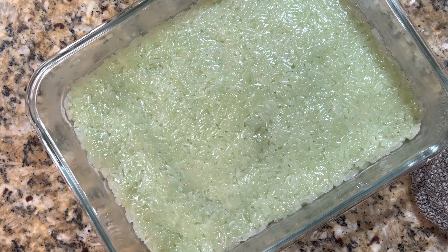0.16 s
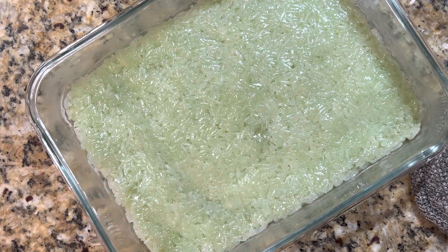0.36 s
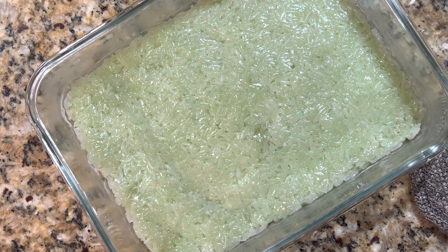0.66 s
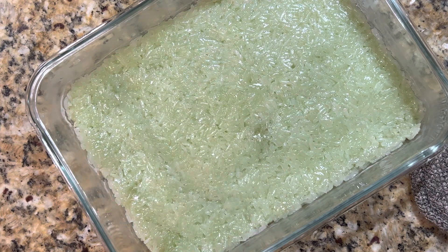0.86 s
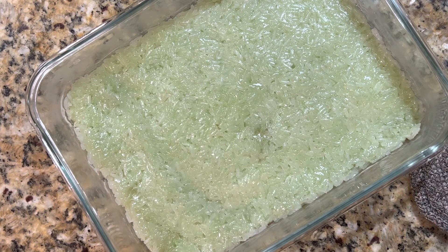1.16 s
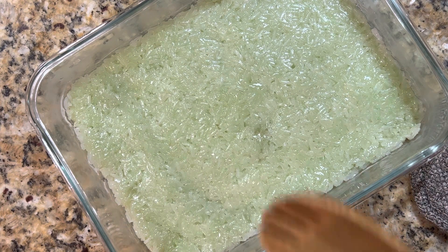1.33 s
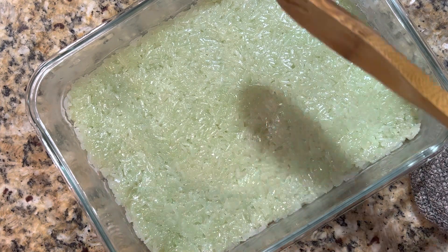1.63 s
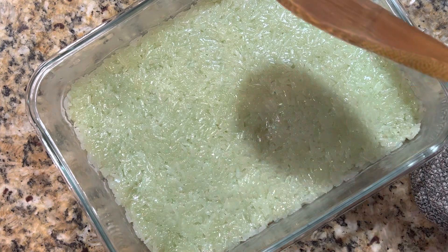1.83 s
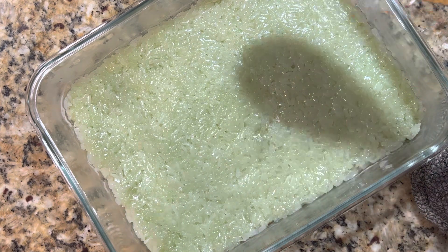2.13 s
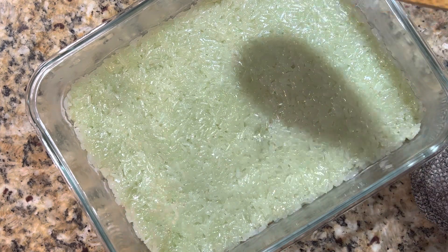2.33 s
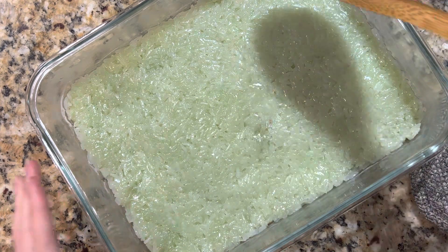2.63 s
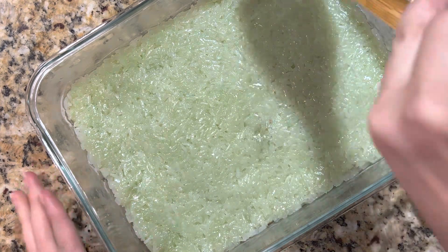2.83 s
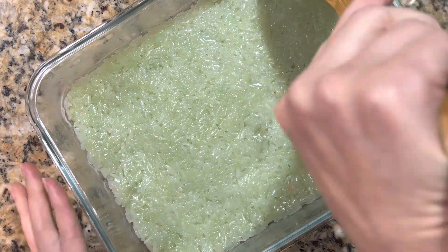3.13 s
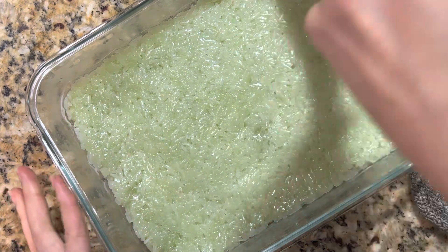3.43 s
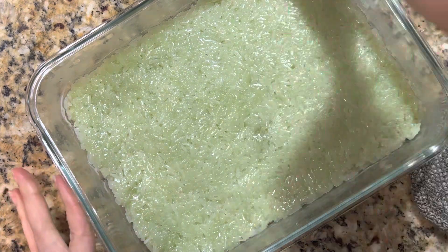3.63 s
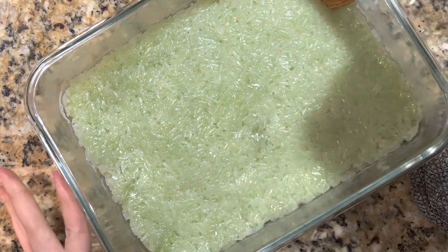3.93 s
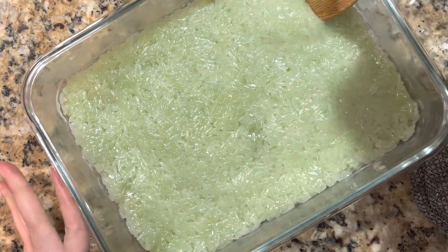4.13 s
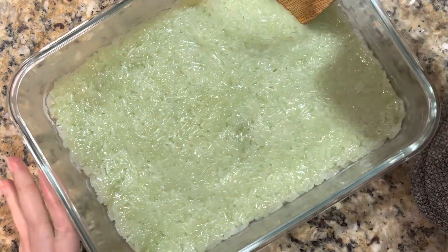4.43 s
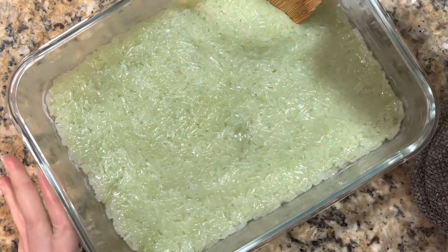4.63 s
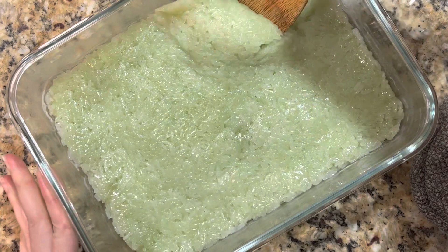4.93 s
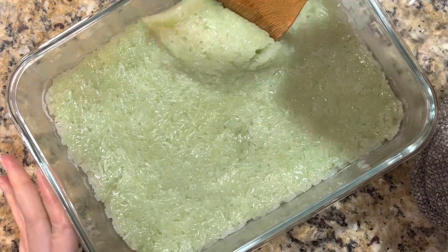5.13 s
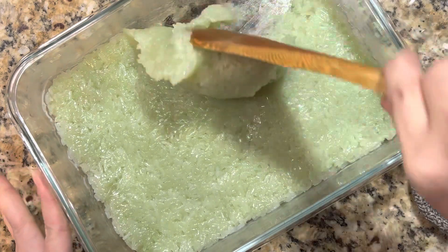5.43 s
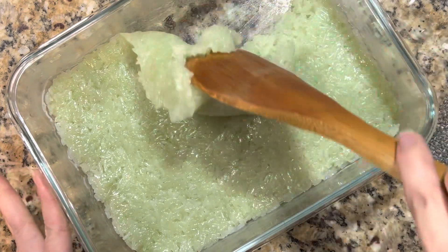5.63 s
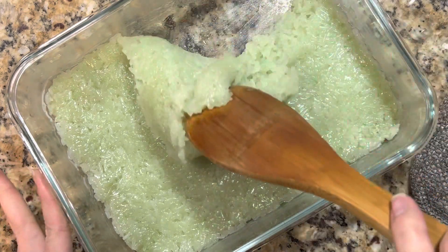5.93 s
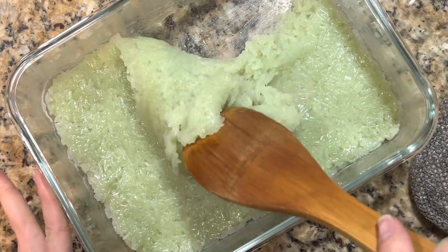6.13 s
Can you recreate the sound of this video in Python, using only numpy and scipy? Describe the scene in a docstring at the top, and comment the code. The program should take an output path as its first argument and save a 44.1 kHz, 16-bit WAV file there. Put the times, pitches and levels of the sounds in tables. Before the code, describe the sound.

In a kitchen with a steady low appliance hum, a drawer rolls out with rattling contents, pauses, rolls back and bangs shut with a boomy ring. Close to the microphone, a wooden paddle then clacks sharply on a glass dish, taps lightly, digs into soft rice with short groans and dull thuds, and lifts a sticky clump with crackle and pops.

```python
"""A kitchen drawer rolls out, rolls back, meets its catch and bangs shut: filtered impacts and ringing panels.
Its contents settle; stick-slip squeaks sound on a glass dish of soft cooked rice, then a wooden paddle knocks
on it, exciting its damped modes, and digs in; groans follow along the glass, and a sticky clump lifts with
crackle, pops and small squelches: many brief decaying notes.
An appliance hums throughout in wavering lines over air noise; the two microphone ports are close by."""
import sys
import numpy as np
from scipy import signal
from scipy.fft import rfft, irfft, next_fast_len
from scipy.io import wavfile
from scipy.ndimage import uniform_filter1d, minimum_filter1d, map_coordinates

SR = 44100
rng = np.random.default_rng(int(sys.argv[2]) if len(sys.argv) > 2 else 0)


def unload_audio(sound):
    """Save the sound as a 16-bit wav file, at the path given as the first command line argument."""
    columns = np.transpose(np.atleast_2d(sound))
    # keep every value between -1 and 1, then stretch to whole-number steps
    steps = np.round(np.clip(columns, -1, 1) * 32767)
    wavfile.write(sys.argv[1], SR, steps.astype(np.int16))


N = 277389

# All levels are relative: each function weights and sums its own parts.
# Paddle blows on the dish: start_s, level_db, contact_lowpass_hz, after_ring_db, contact_highpass_hz,
# wood_pitch_hz, wood_db
KNOCKS = [(2.9487, -7.5, 10000, 3, 200, 3230, 1), (3.5679, -20.5, 1980, -25, 606, 1310, 9.5),
          (3.571, -30.5, 1680, -22, 620, 1060, 8), (3.8065, -25.5, 5000, -26, 1890, 2520, 14),
          (3.8073, -26.5, 2720, -26, 495, 540, 14)]
# Modes of the damped glass dish: pitch_hz, level_db, t60_s, after_ring_share_db
DISH_MODES = [(527, -12.5, 0.029, -28), (924, -5.5, 0.024, -27.5), (986, -6.5, 0.025, -33),
              (1200, -10, 0.023, -42), (1460, -16, 0.025, -57), (1960, -11, 0.018, -55),
              (2700, -20, 0.02, -21), (2820, -11, 0.024, -44), (3020, -9, 0.024, -41),
              (3440, -15, 0.028, -43), (3760, -6.5, 0.0091, -54), (4840, -20, 0.02, -43),
              (5500, 1, 0.0057, -43), (5997, -14, 0.032, -44), (6840, -10, 0.0079, -41),
              (7214, -15, 0.017, -42), (8000, -11, 0.012, -34), (8620, -10, 0.016, -52)]
# Spectrum of the contact noise: pitch_hz, density_db
CLACK_SPECTRUM = [(100, -1), (600, 7.5), (1200, -6), (2000, -2.5), (3200, -4), (4500, 1.5), (5600, 0),
                  (8500, -25), (10500, -11), (16000, -7)]
WOOD_T60_S = 0.0043
CHATTER_PER_S, CHATTER_DEPTH = 140, 0.9  # the paddle chatters against the ringing glass

# Squeaks and groans on the glass, in runs of slips: start_s, first_level_db, first_pitch_hz, slip_count,
# gap_s, growth_per_slip_db, pitch_loss_per_slip (0-1), scrape_db
SLIP_RUNS = [(2.507, -39, 4540, 1, .01, 3, 0, -7.5), (2.661, -30.5, 4300, 1, .01, -2, 0, -18),
             (4.046, -31.5, 1580, 2, .013, -3, .05, -24), (4.102, -28, 3070, 2, .001, -2, 0.05, -33),
             (4.3531, -16, 1004, 4, .0082, -5, 0.07, -6), (4.403, -32, 1560, 2, .0042, -1, 0, -22),
             (4.4338, -14.5, 964, 4, .0098, -4, .06, -7.5), (4.478, -32, 1450, 2, .007, -2, 0, -19),
             (4.492, -27, 990, 2, .0065, 0.5, .1, -6), (4.5054, -15, 540, 1, .01, 0, 0, -7),
             (4.61, -27.5, 1430, 1, .01, 0, 0, -14), (4.618, -28, 1440, 4, .005, 2.5, .04, -14),
             (4.6442, -20.5, 1460, 3, .0043, -3.5, .05, -19), (4.6735, -9, 564, 2, .011, 4, 0, -12),
             (4.7055, -7.5, 626, 4, .0066, -7, 0.05, -4.5)]
# Partials of a slip: pitch_ratio, level_db, cycles_to_60_db_decay
SLIP_PARTIALS = [(.72, -6.5, 10.8), (1, 0, 16.4), (1.36, -12, 18), (2.8, -29, 25)]
SLIP_RISE_CYCLES = 0.51  # time constant of the onset
SLIP_LOW_CUT = 0.53  # share of its pitch below which a slip radiates little

# Pops, ticks and small squelches: start_s, level_db, pitch_hz
POPS = [(2.883, -35, 5660), (3.203, -33, 6100), (3.318, -31, 6700), (3.366, -48, 6400),
        (3.439, -31.5, 8400), (3.527, -36, 5800), (3.537, -37, 5960), (3.6072, -24, 7300),
        (3.6124, -29, 2740), (3.631, -31, 2720), (3.6307, -26, 6000), (3.640, -31, 6200),
        (3.647, -31, 5650), (3.659, -30, 2840), (3.68, -23, 6900), (3.7215, -35, 5950), (3.748, -24, 11000),
        (3.759, -25.5, 10500), (3.7931, -25.5, 6050), (3.945, -33, 3850), (3.9606, -25.5, 6350),
        (4.117, -28.5, 10900), (4.1357, -33, 6200), (4.524, -29.5, 2980), (4.7577, -28, 6500),
        (4.7718, -21, 6100), (4.821, -25, 5760), (4.844, -34, 1450), (4.89, -34, 3250), (4.9, -30, 1450),
        (4.947, -35, 1550), (4.963, -33, 5350), (5.005, -47, 1380), (5.0821, -29.5, 1400),
        (5.153, -31, 3570), (5.156, -24, 7850), (5.162, -16, 5600), (5.1945, -17.5, 2980),
        (5.199, -9, 9250), (5.2146, -22, 3250), (5.233, -28, 3820), (5.2636, -6, 8170), (5.307, -30, 4000),
        (5.3136, -12.5, 7900), (5.324, -31, 6000), (5.361, -17, 7900), (5.377, -20, 7340),
        (5.384, -17, 6440), (5.3935, -25, 7050), (5.4022, -19.5, 7900), (5.426, -31, 6500),
        (5.4865, -25.5, 3000), (5.502, -22, 2900), (5.577, -31, 8300), (5.5978, -27, 6840),
        (5.618, -37, 2900), (5.6384, -25, 3160), (5.7436, -28, 7660), (5.804, -48, 2880),
        (5.822, -27.5, 7600), (5.861, -48, 2830), (5.938, -40, 3260), (5.964, -38, 2880),
        (5.983, -29.5, 6000), (6.1946, -31, 3360), (6.203, -30, 7400), (6.227, -30, 7480)]
POP_CYCLES = 15  # cycles in which the note falls 60 dB
POP_SNAP_T60_S, POP_RISE_S = 0.0035, 0.0002
POP_TAIL_DB, POP_TAIL_T60_S = -18, 0.034  # the snap echoes briefly inside the dish
SMALL_POPS_PER_S, SMALL_POP_DB, SMALL_POP_SCATTER_DB = 14, 6, 9  # level over the effort, and its +/- range
SMALL_POP_HZ, SMALL_POP_OCTAVES = 5350, 0.81  # middle pitch and its +/- range
# How hard the rice is worked, before the offset below: time_s, level_db
WORK = [(3.16, -67.5), (3.44, -62.5), (3.79, -59.5), (3.95, -59.5), (4.14, -60), (4.41, -62.5), (4.67, -53),
        (4.84, -54.5), (5.14, -54.5), (5.36, -52), (5.64, -56.5), (6.29, -58)]
WORK_OFFSET_DB = 3
# Spectrum of the crackle: pitch_hz, density_db
CRACKLE_SPECTRUM = [(500, -28), (1400, -5.5), (2000, -1), (3000, 9), (4600, -3.5), (6000, 10), (7800, 7),
                    (11800, -3), (13500, -10)]
CLUMPING_DB, CLUMPS_PER_S = 3.5, 63  # the crackle comes in little clusters
# Spectrum of the squelching air pockets: pitch_hz, density_db
SQUELCH_SPECTRUM = [(200, -8), (750, 1), (1050, 4), (1450, 3), (1900, -2.5), (3000, -15), (5000, -23)]
SQUELCH_DB, LIFT_S, RELEASE_DB_PER_S = -4, 5.22, 24  # suction lets go once the clump lifts
# Volleys of snaps as a sheet of rice tears: start_s, length_s, level_db, pitch_hz
TEARS = [(3.705, 0.067, -53, 10500), (5.142, 0.029, -42, 3600), (5.187, 0.0114, -46, 4000),
         (5.212, 0.032, -42.5, 4800)]
# Brief dry rubs on the glass: start_s, length_s, level_db, pitch_hz
RUBS = [(2.603, 0.068, -62, 4420), (2.961, 0.12, -50.5, 3240), (3.072, 0.055, -47, 3136),
        (3.603, 0.056, -42, 2870), (4.482, 0.024, -49.5, 2700)]
# Shoves of the dish on the counter: start_s, level_db
SHOVES = [(3.805, -41), (4.37, -33), (4.646, -29), (4.687, -24.5), (4.707, -20), (4.726, -45)]

# The drawer meets its catch: start_s, level_db
CATCH = (1.8435, -7.5)
# Then the drawer meets the cabinet: start_s, level_db
SLAM = (1.8522, -13.5)
# Modes of the cabinet panels: pitch_hz, level_db, t60_s
CABINET_MODES = [(53.4, -5.5, 0.82), (151.6, -3.5, 0.31), (168, 2.5, 0.25), (200, 5, 0.2), (257, -7, 0.51),
                 (356.5, -15, 0.19), (463, -9, 0.49), (611, -11, 0.46), (843, 3, 0.1), (968, -14, 0.39),
                 (1100, -23, 0.68), (1235, 1, 0.18), (1620, -25, 0.6), (1600, -30, 0.3), (2030, -17, 0.61),
                 (2150, -15, 0.39), (2360, -22, 0.48)]
# Spectrum of the bang: pitch_hz, density_db
BANG_SPECTRUM = [(25, -19), (55, 6.5), (100, 3.5), (170, 6.5), (300, 4), (550, -6), (850, -8), (1250, -9),
                 (2200, -9.5), (3300, -20.5), (5000, -25.5), (6800, -28), (9500, -39.5), (13000, -66)]
# Decay of the bang's wash: pitch_hz, t60_s
BANG_DECAY = [(60, 0.64), (170, 0.49), (500, 0.49), (1500, 0.7), (3000, 0.7), (7000, 0.78), (11000, 1)]

# The drawer is pulled out, then pushed back: start_s, stop_s, rumble_db, slowing_loss_db_per_s
PASSES = [(-0.06, 0.462, -27.5, 9.5), (1.03, 1.84, -28.5, 26)]
PUSH_S, COAST_T60_S = 0.025, 0.8  # time to get going; rumble dying after the stop
# Spectrum of the roller rumble: pitch_hz, density_db
ROLLER_SPECTRUM = [(24, -36), (40, -3), (134, -4), (223, 2.5), (347, 1), (425, -18), (500, -7), (599, -8),
                   (779, -20.5), (1270, -17.5), (1430, -22.5), (2100, -23), (2320, -31), (2730, -23.5),
                   (3150, -36), (5000, -64), (6500, -78), (11000, -120)]
# Spectrum of the rattling contents: pitch_hz, density_db
RATTLE_SPECTRUM = [(410, 8.5), (700, 8), (877, 2.5), (1310, 5), (1410, -10), (1980, 2), (3570, -2),
                   (5070, -10), (5750, -3.5), (7300, -4.5), (11600, -27.5), (14000, -72)]
RATTLE_DB = -21  # steady rattle against the rolling level
# Jolts of the drawer on its runners: start_s, rattle_db, t60_s, box_knock_db
JOLTS = [(0.24, -38, 0.024, -58), (0.372, -37.5, 0.087, -54), (0.382, -32.5, 0.21, -24.5),
         (1.132, -30.5, 0.16, -54), (1.14, -30, 0.09, -26), (1.166, -41, 0.26, -26.5)]
SETTLE_DB, SETTLE_RISE_S, SETTLE_T60_S = -8, 0.0026, 0.5  # the contents rattle on after a jolt
# Swishes of the moving drawer and of its contents settling after the slam: peak_s, level_db
SWISHES = [(0.32, -47.5), (0.41, -42.5), (1.05, -51.5), (1.145, -69), (1.555, -51), (1.742, -45.5),
           (2.191, -51.5), (2.41, -60.5)]
SWISH_RISE_DB_PER_S, SWISH_FALL_DB_PER_S = 298, 84
# Spectrum of the swishes: pitch_hz, density_db
SWISH_SPECTRUM = [(400, -11), (2000, -0.5), (4500, -7), (6000, -2.5), (8200, -5.5), (11600, -22),
                  (14000, -61)]
# Drones where the rollers roll evenly: start_s, length_s, level_db, pitch_hz
DRONES = [(0.0, 0.19, -37, 350), (0.01, 0.2, -42, 490), (1.05, 0.14, -37, 358), (1.19, 0.17, -35.5, 195),
          (1.18, 0.26, -44, 490), (1.22, 0.22, -44, 610)]
DRONE_WAVER_PER_S = 130

# Lines of the motor's hum: pitch_hz, level_db, line_width_hz
HUM_LINES = [(52.6, -49, 10), (116.6, -50.5, 3.1), (213.2, -44, 13), (325, -61.5, 5.5), (421.5, -60, 9.1)]
# Spectrum of the rushing air: pitch_hz, density_db
AIR_SPECTRUM = [(20, -36), (35, -39), (55, -1), (85, -6), (150, -7.5), (215, -10), (300, -15), (450, -17),
                (700, -27), (1100, -32.5), (2200, -37.5), (4800, -48.5), (7000, -47.5), (11800, -48.5),
                (14000, -59.5)]
AIR_DB = -44.5
# Reverberation of the kitchen: pitch_hz, t60_s
KITCHEN_DECAY = [(150, 0.52), (700, 0.58), (1800, 0.48), (3500, 0.32), (9000, 0.3), (14000, 0.038)]
# Port difference, before any lean on the direct sound: pitch_hz, side_minus_mid_db
SPREAD = [(60, -34.5), (200, -19), (380, -10.5), (700, -1.5), (1290, -2.5), (2400, -38), (4400, -3.5),
          (6000, -14), (8100, -10.5), (10000, -1), (13000, 17.5)]
TOP_HZ = 16400


def amp(db):
    """Level law: decibels to amplitude gain."""
    return 10 ** (np.asarray(db) / 20)


def unit(x):
    """Normalization: scale to rms 1."""
    return x / np.sqrt(np.mean(x ** 2) + 1e-20)


def along(points, hz):
    """Logarithmic frequency scale: interpolate (pitch_hz, value) points."""
    f, v = np.transpose(points)
    return np.interp(np.log(hz + 1), np.log(f + 1), v)


def wobble(rate):
    """Slow random modulation: a smooth curve through rate random knots a second."""
    knots = rng.standard_normal(int(N * rate / SR) + 4)
    return map_coordinates(knots, [np.arange(N) * rate / SR])


def filtered(x, response):
    """Linear filtering: the spectrum of x times a complex response of frequency."""
    n = x.shape[-1]
    m = next_fast_len(n + 8192)  # padding keeps the filter's tail from wrapping round
    return irfft(rfft(x, m) * response(np.fft.rfftfreq(m, 1 / SR)), m)[..., :n]


def coloured(x, spectrum):
    """Spectral shaping: x filtered by (pitch_hz, level_db) points, at rms 1."""
    return unit(filtered(x, lambda hz: amp(along(spectrum, hz))))


def dying(x, decay):
    """Frequency-dependent damping: each band of x fades with its own t60."""
    hz, t, z = signal.stft(x, SR, nperseg=256)
    loss = amp(-60 * t / along(decay, hz)[:, None])
    return signal.istft(z * loss, SR, nperseg=256)[1][:len(x)]


def fade(t, t60):
    """Exponential decay: 60 dB in t60."""
    return np.exp(-np.log(1000) * t / t60)


def highpass(order, hz):
    """Butterworth high-pass sections."""
    return signal.butter(order, hz, "high", fs=SR, output="sos")


def add(track, s, sound):
    """Superposition: mix a sound into the track at time s."""
    part = track[round(s * SR):][:len(sound)]
    part += sound[:len(part)]


def grains(rate, spread_db):
    """Random impulse process: rate a second, sizes spread exponentially in dB, at rms 1."""
    chance = rng.random(N)
    size = np.minimum(rng.exponential(size=N), 4)
    return unit((chance < rate / SR) * amp(spread_db * size) * rng.choice([-1, 1], N))


def films(rate, cycles, spread_db):
    """Superposed transients: tiny films snap, each dying in a few cycles at its own pitch; rms 1."""
    count = round(rate * N / SR)
    when, pitch, size = rng.random((12000, 3))[:count].T[..., None]  # at most 12000 films
    hz, k = 1200 + 14000 * pitch, np.arange(160)
    strength = amp(spread_db * np.minimum(-np.log(1 - size), 4)) * np.sqrt(hz)
    waves = strength * np.sin(2 * np.pi * hz * k / SR) * fade(k / SR, cycles / hz)
    places = (when * N).astype(int) + k
    return unit(np.bincount(places.ravel(), waves.ravel(), N)[:N])


def knocks():
    """Impact and modal response: a softer contact excites the high modes less; a few modes ring on."""
    out, t = np.zeros(N), np.arange(SR // 2) / SR
    for s, db, bright_hz, ring_db, low_hz, wood_hz, wood_db in KNOCKS:
        blow = amp(-4) * coloured(rng.standard_normal(len(t)), CLACK_SPECTRUM) * fade(t, 0.012)
        blow += amp(wood_db) * np.sin(2 * np.pi * wood_hz * t) * fade(t, WOOD_T60_S)
        chatter = 0.7 + CHATTER_DEPTH * wobble(CHATTER_PER_S)[:len(t)]
        for hz, level, t60, share_db in DISH_MODES:
            after_ring = amp(ring_db + share_db) * chatter * fade(t, 0.57)
            phase = rng.uniform(0, 2 * np.pi)
            blow += amp(level) * (fade(t, t60) + after_ring) * np.sin(2 * np.pi * hz * t + phase)
        softness = signal.butter(5, bright_hz, fs=SR, output="sos")
        contact = np.vstack([softness, highpass(2, low_hz)])
        onset = 1 - np.exp(-t / 0.000092)
        add(out, s, amp(db) * signal.sosfilt(contact, blow * onset))
    return out


def slip(t, hz, scrape_db):
    """Stick-slip release: one squeak or groan with its scrape, longer the lower its pitch."""
    voice = np.zeros(len(t))
    for ratio, level, cycles in SLIP_PARTIALS:
        if hz * ratio < 6000:
            detune = 1 + rng.normal(0, 0.039)
            wave = np.sin(2 * np.pi * hz * ratio * detune * t)
            voice += amp(level) * wave * fade(t, cycles / (hz * ratio))
    spectrum = [(hz / 4, -20), (hz * 0.55, -1), (hz * 1.2, 0), (hz * 2, -15), (hz * 3, -22),
                (hz * 6, -44), (hz * 30, -70)]
    scrape = coloured(rng.standard_normal(len(t)), spectrum) * fade(t, 0.026)
    onset = 1 - np.exp(-t * hz / SLIP_RISE_CYCLES)
    return signal.sosfilt(highpass(3, SLIP_LOW_CUT * hz), (voice + amp(scrape_db) * scrape) * onset)


def slips():
    """Stick-slip friction: squeaks and groans on the glass, in runs of slips whose level and pitch may shift."""
    out, t = np.zeros(N), np.arange(SR // 10) / SR
    for s, db, hz, count, gap, growth, sag, scrape_db in SLIP_RUNS:
        for k in range(round(count)):
            add(out, s + k * gap, amp(db + k * growth) * slip(t, hz * (1 - sag) ** k, scrape_db))
    return out


def effort(s):
    """Mechanical work as level in dB at time s; practically silent until the rice is worked."""
    return WORK_OFFSET_DB + np.interp(s, *np.transpose(WORK), left=-120)


def small_pops():
    """Random transients: lesser pops, louder the harder the rice is worked: start_s, level_db, pitch_hz."""
    start, end = WORK[0][0], WORK[-1][0]
    draws = rng.random((round(SMALL_POPS_PER_S * (end - start)), 3))
    s = start + (end - start) * draws[:, 0]
    size, pitch = (2 * draws[:, 1:] - 1).T
    db = effort(s) + SMALL_POP_DB + SMALL_POP_SCATTER_DB * size
    return list(zip(s, db, SMALL_POP_HZ * 2 ** (SMALL_POP_OCTAVES * pitch)))


def pops():
    """Transient excitation of a resonance: each pop snaps and sets a decaying note going."""
    out, t = np.zeros(N), np.arange(SR // 40) / SR
    for s, db, hz in list(POPS) + small_pops():
        note = np.sin(2 * np.pi * hz * t) * fade(t, POP_CYCLES / hz)
        spectrum = [(hz / 12, -22), (hz / 4, -10), (hz, 0), (hz * 1.48, -5), (hz * 2, -15), (hz * 5, -26)]
        snap = coloured(rng.standard_normal(len(t)), spectrum)
        snap *= fade(t, POP_SNAP_T60_S) + amp(POP_TAIL_DB) * fade(t, POP_TAIL_T60_S)
        onset = 1 - np.exp(-t / POP_RISE_S)
        add(out, s, amp(db) * (1.04 * note + 0.51 * snap) * onset)
    return out


def rice():
    """Adhesion and suction: pops over a dense, clustered crackle; air pockets squelch lower."""
    now = np.arange(N) / SR
    work = amp(effort(now))
    suction = work * amp(SQUELCH_DB - RELEASE_DB_PER_S * np.maximum(now - LIFT_S, 0))
    snaps = films(rate=1700, cycles=5.5, spread_db=4.0) * amp(CLUMPING_DB * wobble(CLUMPS_PER_S))
    crackle = work * amp(-0.5) * coloured(snaps, CRACKLE_SPECTRUM)
    squelch = suction * coloured(grains(rate=350, spread_db=2.5), SQUELCH_SPECTRUM)
    return pops() + squelch + crackle


def tears():
    """Successive rupture: where the rice parts, many films give way in quick succession."""
    out, snaps = np.zeros(N), films(rate=2200, cycles=4, spread_db=1.0)
    for s, length, db, hz in TEARS:
        volley = snaps[round(s * SR):][:round(length * SR)]
        spectrum = [(hz / 8, -12), (hz / 3, -2), (hz, 0), (hz * 2, -6), (hz * 4, -18)]
        envelope = signal.windows.tukey(len(volley), 0.3)
        add(out, s, amp(db) * envelope * coloured(volley, spectrum))
    return out


def rubs():
    """Sliding friction: tiny catches excite one broad resonance."""
    out = np.zeros(N)
    for s, length, db, hz in RUBS:
        n = round(length * SR)
        spectrum = [(hz / 4, -28), (hz * 0.49, -15), (hz * 0.92, 0), (hz * 1.02, 0), (hz * 0.66, -14),
                    (hz * 2.44, -10), (hz * 4, -32)]
        rasp = coloured(grains(rate=1200, spread_db=2.0)[:n], spectrum)
        add(out, s, amp(db) * rasp * signal.windows.tukey(n, 0.2))
    return out


def shoves():
    """Structure-borne impact: the heavy dish jerks, a dull, gritty thud through the counter."""
    out, t = np.zeros(N), np.arange(SR // 3) / SR
    thud_spectrum = [(30, -20), (60, 8), (120, 4), (190, 5), (360, -2.0), (700, -1.5), (3000, -34.0), (8000, -81)]
    grit_spectrum = [(500, -16), (1100, 11), (2300, -2), (3000, -6), (4000, -50), (9000, -44)]
    for s, db in SHOVES:
        thud = coloured(rng.standard_normal(len(t)), thud_spectrum) * fade(t, 0.15)
        grit = coloured(grains(rate=1400, spread_db=0.5)[:len(t)], grit_spectrum) * fade(t, 0.053)
        add(out, s, amp(db) * (thud + amp(-2.0) * grit) * (1 - np.exp(-t / 0.0011)))
    return out


def slam():
    """Impact and modal decay: a soft bump on the catch, then a crack, ringing panels and the room's answer."""
    out, t = np.zeros(N), np.arange(SR) / SR
    bump = np.sin(2 * np.pi * 270 * (t - 0.0052)) * np.exp(-((t - 0.0062) / 0.0022) ** 2)
    tick = coloured(rng.standard_normal(SR), BANG_SPECTRUM) * fade(t, 0.032)
    catch_s, catch_db = CATCH
    add(out, catch_s, amp(catch_db) * (bump + amp(-13) * tick) * (1 - np.exp(-t / 0.00035)))

    panels = np.zeros(SR)
    for hz, db, t60 in CABINET_MODES:
        panels += amp(db) * np.sin(2 * np.pi * hz * t + rng.normal(0, 0.64)) * fade(t, t60)
    wash = dying(coloured(grains(rate=3100, spread_db=-0.5)[:SR], BANG_SPECTRUM), BANG_DECAY)
    thud_spectrum = [(60, -23), (300, 1), (750, 3.5), (1400, -2.0), (3000, -10.5), (9000, -69), (13000, -57)]
    thud = coloured(rng.standard_normal(SR), thud_spectrum) * fade(t, 0.041)
    crack_spectrum = [(500, 6), (2000, 6.5), (6500, 3.5), (8500, -9), (12000, -20), (15000, -48)]
    crack = coloured(rng.standard_normal(SR), crack_spectrum) * fade(t, 0.0082)
    body = (amp(-1.0) * panels + amp(-1.5) * wash + amp(8.0) * thud) * (1 - np.exp(-t / 0.00037))
    crack = amp(8.0) * crack * (1 - np.exp(-t / 0.00008))
    slam_s, slam_db = SLAM
    add(out, slam_s, amp(slam_db) * (body + crack))
    return out


def drawer():
    """Rolling noise: bumps excite the rollers, less as the drawer slows; drawer and contents swish and rattle."""
    t = np.arange(N) / SR
    roll = np.zeros(N)
    for start, stop, db, slowing in PASSES:
        push = np.clip((t - start) / PUSH_S, 0, 1) ** 2
        speed_gain = amp(db - slowing * np.clip(t - start, 0, None))
        roll += speed_gain * push * fade(np.maximum(t - stop, 0), COAST_T60_S)
    rumble = roll * amp(-1.0) * coloured(grains(rate=2500, spread_db=1.5), ROLLER_SPECTRUM)

    shake, bang = roll * amp(RATTLE_DB), np.zeros(N)
    settle = amp(SETTLE_DB) * fade(t, SETTLE_T60_S) * (1 - np.exp(-t / SETTLE_RISE_S))
    for s, db, t60, box_db in JOLTS:  # a jolt shakes the contents and knocks the drawer's box
        add(shake, s, amp(db) * np.maximum(fade(t, t60), settle))
        add(bang, s, amp(box_db) * fade(t, t60))
    rattle = shake * coloured(grains(rate=6000, spread_db=2.0), RATTLE_SPECTRUM)
    box_spectrum = [(100, -4), (350, 12.5), (700, -7.0), (2000, -2.5), (5000, -59)]
    box = bang * coloured(rng.standard_normal(N), box_spectrum)

    swell = np.zeros(N)
    for s, db in SWISHES:
        swell += amp(db - np.maximum(SWISH_RISE_DB_PER_S * (s - t), SWISH_FALL_DB_PER_S * (t - s)))
    swish = swell * coloured(grains(rate=6000, spread_db=2), SWISH_SPECTRUM)
    return rumble + box + swish + rattle


def drones():
    """Narrow-band resonance: the rollers drone with an unsteady amplitude and phase."""
    out = np.zeros(N)
    for s, length, db, hz in DRONES:
        n = round(length * SR)
        sway = (wobble(DRONE_WAVER_PER_S) + 1j * wobble(DRONE_WAVER_PER_S))[:n]
        tone = unit(np.real(sway * np.exp(2j * np.pi * hz * np.arange(n) / SR)))
        add(out, s, amp(db) * signal.windows.tukey(n, 0.5) * tone)
    return out


def appliance():
    """Line and broadband noise: a motor hums in wavering lines over the rush of air."""
    t = np.arange(N) / SR
    hum = np.zeros(N)
    for hz, db, width in HUM_LINES:
        sway = 1 + 0.6 * (wobble(3 * width) + 1j * wobble(3 * width))
        hum += amp(db) * unit(np.real(sway * np.exp(2j * np.pi * hz * t)))
    return hum + amp(AIR_DB) * coloured(rng.standard_normal(N), AIR_SPECTRUM)


def kitchen(x):
    """Diffuse reverberation: convolution with the decaying noise tail of a small hard room."""
    tail = dying(rng.standard_normal(SR // 2), KITCHEN_DECAY)
    return signal.fftconvolve(x, tail / np.linalg.norm(tail))[:N]


def ports(mid, scattered, lean):
    """Spaced reception: the ports differ by some direct sound and some sound from other directions."""
    direct = filtered(mid, lambda hz: amp(along(SPREAD, hz)) * lean)  # lean: complex gain and phase
    side = direct + filtered(scattered, lambda hz: amp(along(SPREAD, hz)))
    return np.array([mid + side, mid - side])


def far():
    """Superposition of the sources out in the room, with fresh random draws on each call."""
    return drawer() + drones() + slam() + appliance()


def scene():
    """Near and diffuse fields: the dish is near the ports; drawer and appliance arrive from all sides."""
    glass, friction, thuds = knocks(), slips(), shoves()
    crackle = rice() + tears() + rubs()
    send = amp(-16.0) * glass + amp(-15) * friction + amp(-11) * thuds + amp(-10.5) * crackle
    dish = glass + friction + thuds + crackle + kitchen(send)
    near = ports(dish, kitchen(send), lean=0.73 * np.exp(1.65j))
    return near + ports(far(), amp(-0.5) * far(), lean=0.5 * np.exp(1.7j))


def record(dry):
    """Peak limiting and band limiting: fast gain holds peaks within full scale, and the top band is cut."""
    need = 1 / np.maximum(1, np.abs(dry).max(axis=0))
    gain = uniform_filter1d(minimum_filter1d(need, size=90), size=90)
    return filtered(dry * gain, lambda hz: hz < TOP_HZ)


dry = scene()
out = record(dry)
unload_audio(out)
```